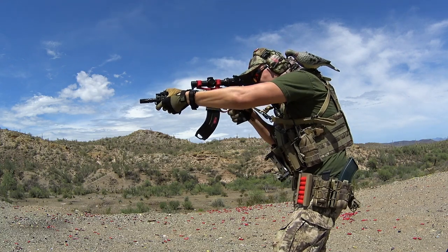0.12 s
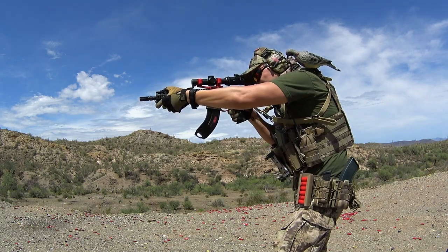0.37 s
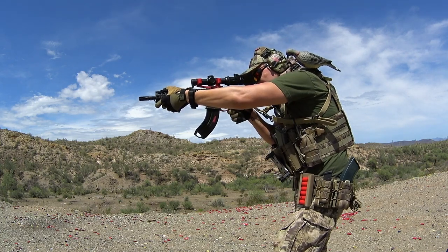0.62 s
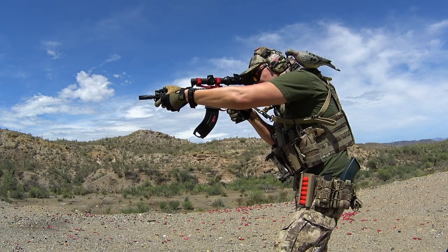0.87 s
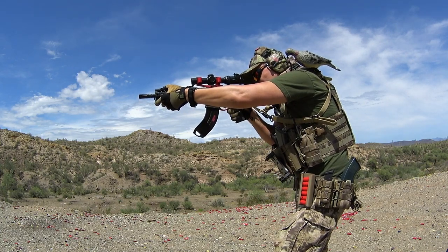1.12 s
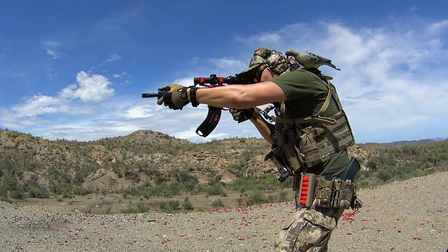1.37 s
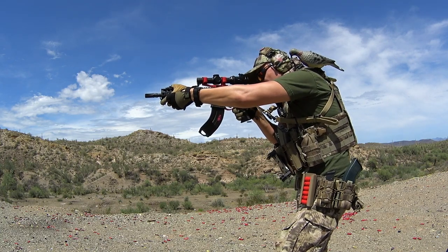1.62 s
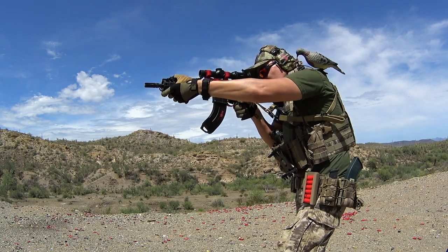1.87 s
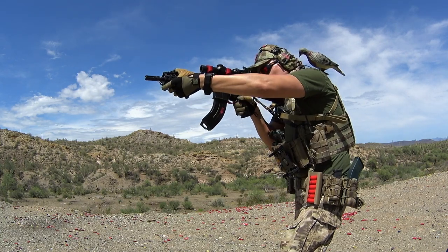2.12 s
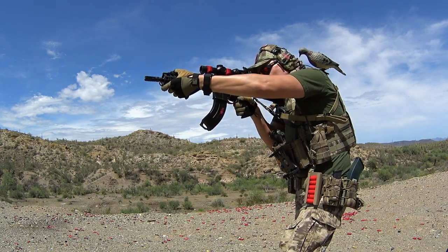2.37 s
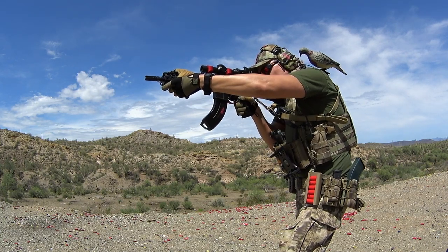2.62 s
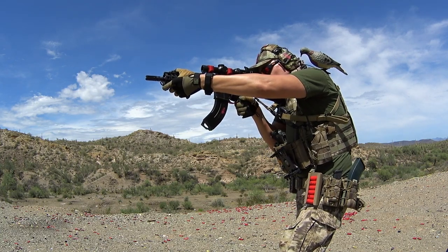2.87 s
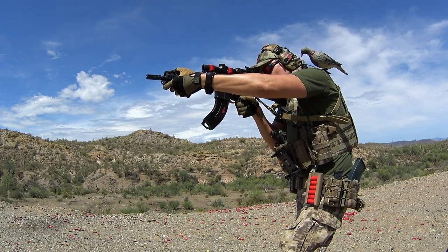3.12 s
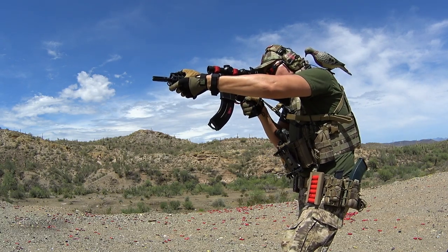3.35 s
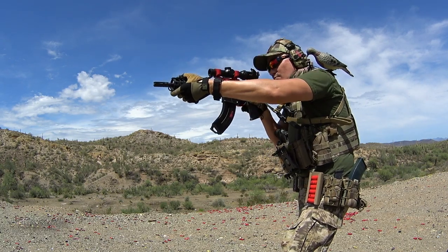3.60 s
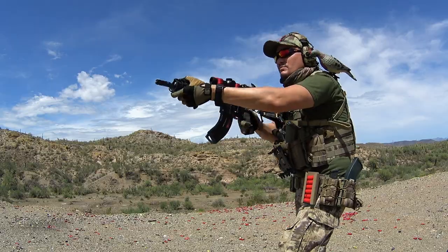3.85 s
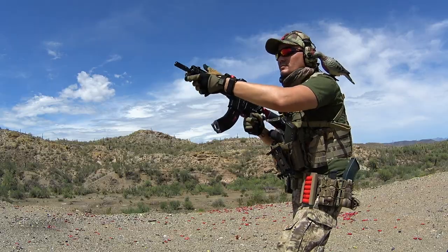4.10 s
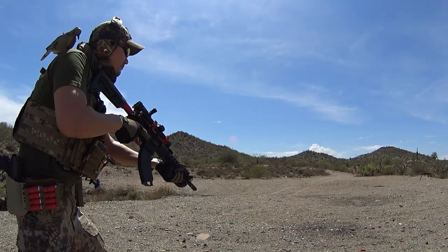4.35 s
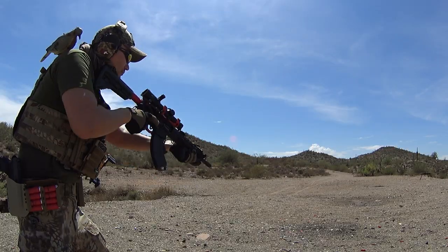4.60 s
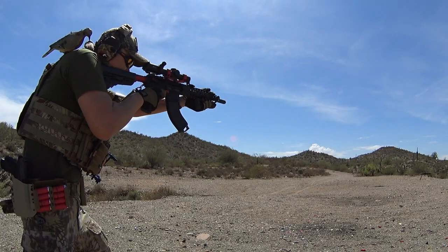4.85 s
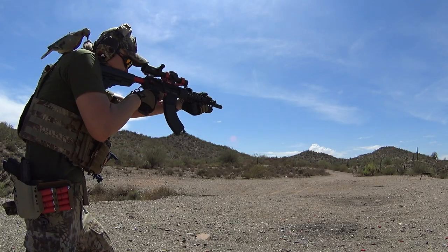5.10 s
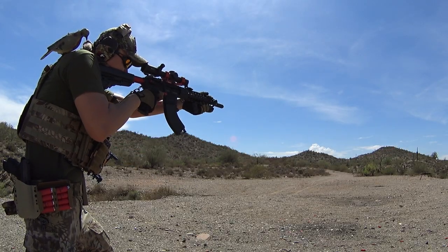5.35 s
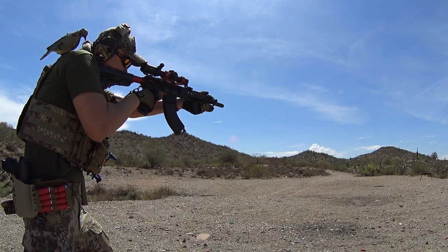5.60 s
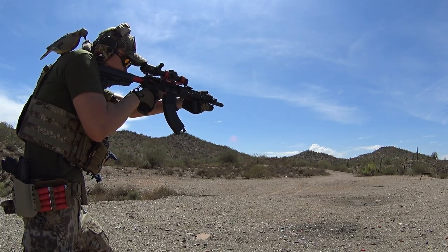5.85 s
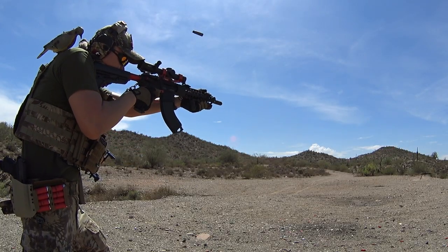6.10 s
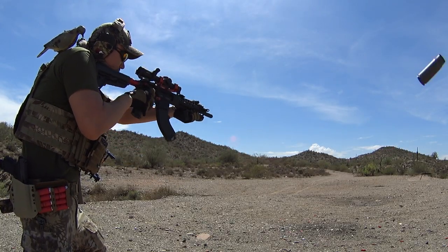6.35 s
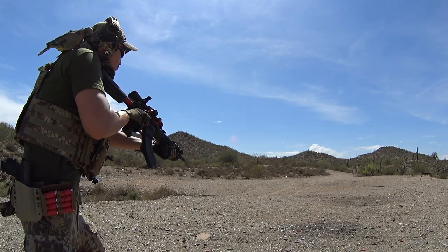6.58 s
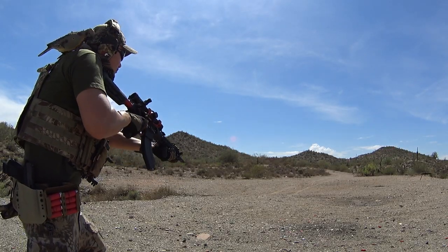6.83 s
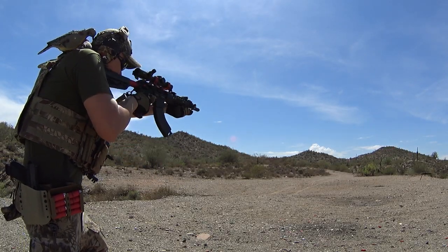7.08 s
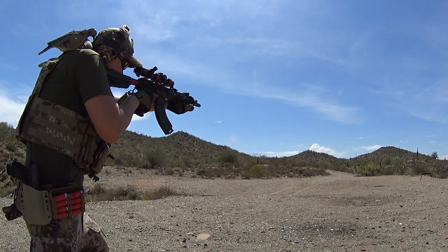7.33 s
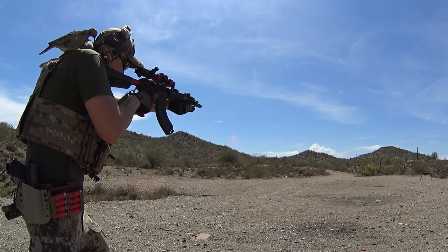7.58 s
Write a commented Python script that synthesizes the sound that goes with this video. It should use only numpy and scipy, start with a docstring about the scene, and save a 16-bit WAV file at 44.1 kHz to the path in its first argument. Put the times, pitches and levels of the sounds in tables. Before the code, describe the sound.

Outdoors on open stony ground, a few steps from the shooter, wind bumps the microphone softly. A rifle cracks, its bolt clacks, steel rings and a spent case tinkles; a second shot follows nearly two seconds later with a richer metallic ring. Gear clicks, then the place cuts abruptly, echoes stop, cloth rustles faintly, and a third shot rings and rolls away from the hills.

```python
"""Open stony ground: three rifle shots, heard from a few steps away, in two scenes joined by an abrupt cut.
Each shot is bursts of coloured noise: hammer tick, muzzle blast, bolt slamming home. Fading sine tones make the
struck steel ring. Long noise, shaped in level, makes the echoes that roll back from the hills.
Gear clicks and cloth rustles as noise; spent cases tinkle as pairs of high tones on gravel.
Wind rumbles on the microphone as low noise, with short low thumps, above a faint hiss."""
import sys
import numpy as np
from scipy import signal
from scipy.fft import rfft, irfft
from scipy.io import wavfile

SR = 44100
rng = np.random.default_rng(int(sys.argv[2]) if len(sys.argv) > 2 else 0)


def decibels_to_gain(level_db):
    """Convert a level in decibels to a linear amplitude gain (20 dB per decade)."""
    exponent = np.asarray(level_db, float) / 20
    return 10 ** exponent


def wav_record(signal):
    """Record a signal, one row per channel, as 16-bit PCM in the file named by sys.argv[1]."""
    frames = np.transpose(np.atleast_2d(signal))
    bounded = np.clip(frames, -1, 1)
    # unit amplitude maps onto the largest positive 16-bit level
    quanta = np.round(bounded * 32767).astype(np.int16)
    wavfile.write(sys.argv[1], SR, quanta)


N = 340011


def rms_one(x):
    """Scales to rms 1."""
    return x / np.sqrt(np.mean(x ** 2) + 1e-20)


def in_time(rows):
    """Columns of a table, joined by straight lines in time."""
    s, *columns = np.transpose(rows)
    return [np.interp(np.arange(N) / SR, s, column) for column in columns]


def at_hz(points, hz):
    """Reads a spectrum on a log frequency axis."""
    point_hz, db = np.transpose(points)
    return np.interp(np.log(hz), np.log(point_hz), db)


def drift(rate):
    """Slow random wandering of spread 1; a higher rate wanders faster."""
    r = np.exp(-80 * np.pi * rate / SR)   # computed at every 40th sample only
    draws = rng.standard_normal(N // 40 + 2002)
    slow = signal.lfilter([1], [1, -2 * r, r * r], draws)[2000:]
    return np.interp(np.arange(N) / 40, np.arange(len(slow)), rms_one(slow))


# tilt of all noise to the left or right: (frequency [Hz], left over right [dB])
BALANCE = [(60, -0.5), (180, 0.5), (550, 0.0), (1650, 1.0), (4970, 1), (15000, 1.5)]


def noise(spectrum, width, low_hz=0, high_hz=SR):
    """Stereo noise of a given mid colour, width and balance, within two edges; the mid has rms 1."""
    hz = np.arange(N // 2 + 1) * SR / N + 1e-3
    mid, side = rfft(rng.standard_normal((2, N)))
    pair = mid + decibels_to_gain(at_hz(width, hz)) * side * [[1], [-1]]
    colour_db = at_hz(spectrum, hz) + at_hz(BALANCE, hz) * [[.5], [-.5]]
    colour = decibels_to_gain(colour_db) * (hz >= low_hz) * (hz < high_hz)
    out = irfft(pair * colour, N)
    return out / np.std(out.mean(axis=0))


def dying(s, t60, rise_s):
    """First sample and an envelope that swells, then falls 60 dB in t60."""
    start = round(s * SR)
    t = np.arange(min(round(1.3 * SR * t60), N - start)) / SR
    return start, (1 - np.exp(-t / rise_s)) * decibels_to_gain(-60 * t / t60)


def panned(db):
    """Gains of the two channels, db apart."""
    return decibels_to_gain(np.array([[db / 2], [-db / 2]]))


def tone(hz, shape, phase=0):
    """A sine under an envelope."""
    return shape * np.sin(2 * np.pi * hz * np.arange(len(shape)) / SR + phase)


# the shots: (time [s], blast level [dB], bark level [dB], left over right [dB])
SHOTS = [(1.3797, -8.5, -16, 1.5), (3.2049, -7.5, -15, 1), (5.9778, -7, -23, -2)]
# colour of the crack: (frequency [Hz], relative level [dB])
CRACK_COLOUR = [(180, -46.5), (300, -19.5), (629, -15), (1410, -3.5), (2150, -10), (3820, -7.5),
                (4150, -9.5), (5810, -7), (7610, -19), (10100, -24.5), (14900, -10.5), (16000, -27.5),
                (16800, -52)]
# colour of clicks, bolt and snap: (frequency [Hz], relative level [dB])
CLICK_COLOUR = [(410, -50.5), (700, -16.5), (2350, -18.5), (3020, -2.5), (3550, -9), (5010, 0.5),
                (6450, -3.5), (7370, -20), (8640, -14), (10100, -17), (14700, 2), (15500, -8),
                (16800, -37.5)]
# stereo width of rifle and gear: (frequency [Hz], side over mid [dB])
NEAR_SIDE = [(60, -8.5), (150, -16), (380, 4), (950, -10.5), (2380, -1.5), (5980, -13.5), (15000, -14.5)]
BARK_HZ, BARK_WIDTH_HZ = 1380, 440


def blasts():
    """A bright snap and a longer crack over a barking resonance of the muzzle device; the barrel rings on."""
    crack = noise(CRACK_COLOUR, NEAR_SIDE)
    snap = noise(CLICK_COLOUR, NEAR_SIDE, 2500)
    bark = noise([(20, -60), (BARK_HZ - BARK_WIDTH_HZ, -12), (BARK_HZ, 0),
                  (BARK_HZ + BARK_WIDTH_HZ, -12), (8000, -50)], NEAR_SIDE)
    out = np.zeros((2, N))
    for s, db, bark_db, pan_db in SHOTS:
        # each layer: (noise, level [dB], time to fall 60 dB [s], rise [s])
        layers = [(snap, db - 5, .025, .0006), (crack, db - 11, .16, .001), (bark, bark_db, .15, .003)]
        for layer, level_db, t60, rise_s in layers:
            i, shape = dying(s, t60, rise_s)
            burst = layer[:, i:i + len(shape)] * shape
            out[:, i:i + len(shape)] += burst * decibels_to_gain(level_db) * panned(pan_db)
        i, shape = dying(s, .8, .02)
        out[:, i:i + len(shape)] += decibels_to_gain(-32) * tone(1938, shape)   # steel of the rifle
    return out


# hard slaps of the blast off near banks and the plate:
# (time [s], slap level [dB], thump level [dB], left over right [dB])
SLAPS = [(1.495, -4.5, -20, 8), (1.51, -11, -18, -5), (1.53, -15, -27.5, 11.5), (1.574, -17, -33.5, -18),
         (2.057, -30.5, -24, 12), (2.515, -23, -30, 4.5), (3.356, -14.5, -14, -2),
         (3.395, -16.5, -33.5, 3.5), (3.406, -10, -31.5, -8.5), (6.096, -2, -26, -3.5),
         (6.131, -13, -27, -2), (6.174, -10, -24, 9)]
SLAP_HZ, SLAP_T60_S = 1440, .0056


def slaps():
    """A cycle or two of pressure with a sharp edge, with a low thump that reaches both ports alike."""
    out = np.zeros((2, N))
    for s, db, thump_db, pan_db in SLAPS:
        # each part: (pitch [Hz], level [dB], time to fall 60 dB [s], rise [s], left over right [dB])
        parts = [(SLAP_HZ, db, SLAP_T60_S, .0002, pan_db),
                 (3.6 * SLAP_HZ, db - 11, SLAP_T60_S / 2, .0001, pan_db),
                 (246.6, thump_db, .069, .002, 0)]
        for hz, level_db, t60, rise_s, side_db in parts:
            i, shape = dying(s, t60, rise_s)
            out[:, i:i + len(shape)] -= decibels_to_gain(level_db) * tone(hz, shape) * panned(side_db)
    return out


# modes of three pieces of steel: (frequency [Hz], level [dB], unstretched time to fall 60 dB [s],
# swell [s], left over right [dB], phase by which the left leads [rad])
STAND = [(991, -33, 1.5, .06, 0, .2), (1425, -33, 1.8, .05, 3, .4), (1937, -22, 1.1, .1, 0, .3)]
NEAR_PLATE = [(4684, -31, .9, .03, 4, -2.0), (4693, -33, .7, .03, 4, -2.0), (4702, -50, 3.4, .02, 4, -2.0)]
FAR_PLATE = [(2796, -31, .35, .005, 7, 1.3), (3877, -30, .9, .1, 0, 0), (4560, -34, .4, .005, 7, 2.9),
             (5070, -31, .45, .01, 4, 2.9), (5082, -33, .45, .01, 4, 2.9), (5809, -34, .7, .08, 4, -1.0),
             (5956, -30, .2, .005, 8, -1.1), (6087, -27, .22, .005, 8, -1.0), (6850, -50, .5, .01, 4, -2.2),
             (7404, -42, .4, .03, 4, .2), (10127, -49, .4, .04, -7, -1.2), (11620, -51, .4, .03, -7, 0),
             (15170, -39, .25, .01, 0, 0)]
# bullet strikes: (what rings, time [s], added level [dB], stretch of the ring [factor])
STRIKES = [(STAND, 1.511, -5, 1.0), (NEAR_PLATE, 1.505, 4, 1.0), (STAND, 3.396, 0, 1.0),
           (FAR_PLATE, 3.396, 0, 1.0), (STAND, 6.098, -8, 1.3), (NEAR_PLATE, 6.098, -1, 1.4)]


def plate():
    """A strike sets every mode of its steel ringing; close modes beat, each mode's level wavers slightly."""
    out = np.zeros((2, N))
    for modes, s, strike_db, stretch in STRIKES:
        for hz, db, t60, swell_s, pan_db, lead in modes:
            total = abs(decibels_to_gain(pan_db / 2) * np.exp(1j * lead) + decibels_to_gain(-pan_db / 2))
            ports = panned(pan_db) / total * 2   # the mean of both channels has gain 1
            i, shape = dying(s, t60 * stretch, swell_s)
            shape = shape * decibels_to_gain(2 * drift(14))[i:i + len(shape)]
            pair = [tone(hz, shape, lead), tone(hz, shape)]
            out[:, i:i + len(shape)] += decibels_to_gain(db + strike_db) * ports * pair
    return out


def bursts(rows, t60s, swell_s, edge_db):
    """Short bursts, each with its own weight of thud, snap and sizzle; edge_db sets the hard first contact."""
    edges_hz = [(600, 2500), (2500, 8500), (8500, 17500)]
    bands = [noise(CLICK_COLOUR, NEAR_SIDE, *edges) for edges in edges_hz]
    out = np.zeros((2, N))
    for s, snap_db, thud_db, sizzle_db, pan_db in rows:
        for band, level_db, t60 in zip(bands, [thud_db, snap_db, sizzle_db], t60s):
            i, shape = dying(s, t60, swell_s)
            t = np.arange(len(shape)) / SR
            shape = shape * (1 + decibels_to_gain(edge_db - 60 * t / .007))
            burst = band[:, i:i + len(shape)] * shape
            # evens out the chance in the energy of so short a noise
            even = np.sqrt(np.sum(shape ** 2) / np.sum(burst.mean(axis=0) ** 2))
            out[:, i:i + len(shape)] += decibels_to_gain(level_db) * even * burst * panned(pan_db)
    return out


# the bolt slams home, several parts at once:
# (time [s], snap level [dB], thud level [dB], sizzle level [dB], left over right [dB])
BOLT = [(1.4542, -21, -26.5, -19.5, 1.5), (3.274, -16, -29.5, -21, 1.5), (6.0572, -14.5, -27, -17.5, -5.5)]


def bolt():
    """Heavy parts meeting: a blunt clack with a slower start and little edge."""
    return bursts(BOLT, [.03, .024, .02], .0008, -19)   # fall of thud, snap, sizzle [s]; swell [s]; edge [dB]


# ticks of hammer and gear, bullet splashes on the plate, gravel:
# (time [s], snap level [dB], thud level [dB], sizzle level [dB], left over right [dB])
CLICKS = [(.207, -53.5, -59, -56, -1), (0.482, -66, -55, -75, 2), (1.3727, -17.5, -35, -19.5, 1),
          (1.509, -29.5, -25, -38, 4), (1.5945, -46, -25.5, -40, -1), (1.88, -35, -42, -55, -1),
          (2.099, -37, -54, -39, -1), (2.831, -50, -55, -57, 0), (3.1982, -19, -28.5, -18.5, -1),
          (3.3956, -25.5, -18, -40, 5), (3.6587, -18, -44, -20.5, -1), (3.846, -37, -46, -45, -1),
          (3.8944, -26, -30.5, -34, -2), (3.942, -35, -53, -33, -2), (3.967, -34, -42, -49, 0),
          (4.102, -21.5, -30.5, -33, -1), (4.1619, -43, -55, -48, 0), (4.6194, -52, -56, -58, 1),
          (4.6474, -28, -42.5, -30.5, 1), (4.709, -67, -53, -73, 3), (5.6126, -68, -53.5, -78, -6),
          (5.9706, -18.5, -33, -18, 0), (6.1753, -26, -29, -35, -1), (6.5033, -20.5, -31, -26, 2),
          (6.549, -31.5, -42, -30, 3), (6.6928, -38, -49, -39.5, -10), (6.919, -59, -40, -58, -7),
          (7.0087, -52, -39, -50, -3), (7.0339, -31.5, -46, -41, -3)]


def clicks():
    """Short hard contacts: ticks of hammer and gear, bullet splashes on the plate, gravel."""
    return bursts(CLICKS, [.024, .02, .018], .0002, 3)   # fall of thud, snap, sizzle [s]; swell [s]; edge [dB]


# how strongly ground and hills return any shot: (time after the shot [s], level [dB])
TERRAIN = [(0, -26.5), (.04, -29), (.09, -34.5), (.12, -32), (.15, -35), (.19, -30), (.23, -31.5),
           (.27, -29.5), (.32, -32.5), (.4, -35.5), (.5, -38), (.6, -40), (.7, -40), (.76, -43), (.8, -38),
           (.89, -35.5), (.96, -39.5), (1.05, -37), (1.15, -41), (1.25, -46), (1.5, -43), (1.8, -47),
           (2.9, -68)]
# how loud, bright and boomy each shot's echo is, and how fast its treble fades:
# (level [dB], brightness [dB per band going up], boom [dB], share of the treble loss [factor])
ECHO_TRAITS = [(0.5, -1.5, 0.5, 0.53), (0.5, -1.5, -1, 0.3), (1, 3.5, 0.5, 1.54)]
SECOND_SCENE_S = 4.229


def returns(level_db):
    """Adds up the power that the hills return of every shot, each within its own scene.
    level_db(terrain dB, delay s, traits) gives one shot's level."""
    t, power = np.arange(N) / SR, 0
    for (s, *_), traits in zip(SHOTS, ECHO_TRAITS):
        delay = np.maximum(t - s, 0)
        heard = (t > s) & ((t < SECOND_SCENE_S) | (s > SECOND_SCENE_S))
        hills_db = np.interp(delay, *np.transpose(TERRAIN))
        power = power + heard * decibels_to_gain(2 * level_db(hills_db, delay, traits))
    return np.sqrt(power)


# colour of the echoes: (frequency [Hz], relative level [dB])
ECHO_COLOUR = [(210, -30), (350, -8.5), (468, -16), (658, -9), (971, -11.5), (1460, -8.5), (1830, -10),
               (1920, -10), (2410, -14), (4380, -11.5), (4830, -12.5), (10000, -30), (15000, -22),
               (16000, -29.5), (16800, -80)]
# stereo width of echoes and low end: (frequency [Hz], side over mid [dB])
FAR_SIDE = [(60, -31.5), (120, -18.5), (240, -28.5), (480, -9.5), (950, -11.5), (1890, -7), (3770, -3),
            (7520, -6), (15000, -18.5)]
# where the bands cross over: end of middle alone, start and end of treble alone, start of top alone [Hz]
ECHO_EDGES = [1600, 3500, 5800, 7300]
# middle, treble and top of the echoes:
# (level at the shot [dB], air loss before the shot's share [dB/s], own flicker [dB])
AIR = [(0.7, 0.7, 1.5), (-0.5, 8, 0.87), (-5, 24.5, 3)]


def echoes():
    """Countless returns from rocks and slopes as noise; air takes the treble first; the level flickers."""
    whole = rfft(noise(ECHO_COLOUR, FAR_SIDE))
    together_db = 1.3 * drift(19.3) + 1.046 * drift(90.0)
    log_hz = np.log(np.arange(N // 2 + 1) * SR / N + 1e-3)
    shares = [[1, 0, 0, 0], [0, 1, 1, 0], [0, 0, 0, 1]]   # each band at the four edges; they add up flat
    out = 0
    for k, (share, (db, loss_db, flicker_db)) in enumerate(zip(shares, AIR)):
        band = irfft(whole * np.interp(log_hz, np.log(ECHO_EDGES), share), N)
        level = returns(lambda hills_db, delay, traits:
                        hills_db + traits[0] + db + k * traits[1] - loss_db * traits[3] * delay)
        out = out + band * level * decibels_to_gain(together_db + flicker_db * drift(33.0))
    return out


# colour of the boom: (frequency [Hz], relative level [dB])
BOOM_COLOUR = [(76, -47.5), (130, -24.5), (145, -19), (230, 2.5), (248, 2.5), (287, -2), (426, -27),
               (480, -27), (620, -42), (1060, -120)]


def boom():
    """The low end of the shots swells and rolls back from the hills, evener than the rest."""
    # it takes 0.61 of the hills' swing in dB and swells over 0.012 s
    level = returns(lambda hills_db, delay, traits: -11 + traits[2] + 0.61 * hills_db
                    + 20 * np.log10(1.001 - np.exp(-delay / 0.012)))
    return noise(BOOM_COLOUR, FAR_SIDE) * level * decibels_to_gain(2 * drift(21.0))


# a spent case ringing in flight: (frequency [Hz], level [dB], time to fall 60 dB [s], left over right [dB])
FLYING_CASE = [(7117, -50, .2, 2), (7648, -44, .38, 6), (8406, -53, .22, -10), (11550, -42, .26, -9),
               (12840, -48, .3, -3), (15205, -38, .24, 0), (15395, -24, .25, 0)]
KNOCK_S, PULSES_PER_S = 1.509, 32


def flying_case():
    """A knocked case rings in pulsing tones, each in its own phase, then fades fast as it drops away."""
    t, i, out = np.arange(SR // 2) / SR, round(KNOCK_S * SR), np.zeros((2, N))
    for hz, db, fade_s, pan_db in FLYING_CASE:
        pulsing = 1 + .6 * np.cos(2 * np.pi * PULSES_PER_S * t + rng.uniform(0, 2 * np.pi))
        fade = decibels_to_gain(db - 60 * (t / fade_s) ** 1.7)   # slow at first, then ever faster
        shape = (1 - np.exp(-t / .022)) * fade * pulsing
        out[:, i:i + len(t)] += panned(pan_db) * tone(hz, shape)
    return out


# spent cases landing: (time [s], level [dB], frequency [Hz], time to fall 60 dB [s])
CASES = [(2.098, -32, 12200, 0.11), (2.46, -65, 12600, 0.11), (2.8315, -40.5, 12700, 0.082),
         (3.9435, -33, 11720, 0.028), (4.102, -47, 13900, 0.045), (6.70, -56, 12600, 0.069)]


def cases():
    """A thin tube rings briefly on two close pitches."""
    out = np.zeros(N)
    for s, db, hz, t60 in CASES:
        i, shape = dying(s, t60, 0.00025)
        out[i:i + len(shape)] += decibels_to_gain(db) * (tone(hz, shape) + .4 * tone(hz * 1.012, shape))
    return out


def rustle():
    """Soft uneven friction of cloth and straps as the rifle comes up."""
    i, shape = dying(4.55, 2.0, .12)
    level = np.pad(shape, (i, N))[:N] * decibels_to_gain(-62 + 4.6 * drift(24.7))
    return level * noise([(600, -28), (1200, 1), (4500, -3.5), (6500, -5), (9000, -31)], NEAR_SIDE)


# colour of the wind's rumble: (frequency [Hz], relative level [dB])
RUMBLE_COLOUR = [(12, -35.5), (20, -12), (103, -3.5), (140, -8), (160, -6), (210, -8.5), (350, -120)]
# wind on the ports, in three stretches: (time [s], rumble level [dB], boomy part over the rumble [dB])
WIND = [
    [(0.0, -51, -0.5), (0.258, -53.5, -3.5), (0.328, -64, -8), (0.618, -62.5, -1), (0.992, -58, -10.5),
     (1.178, -61, -15), (1.37, -63, -6)],
    [(1.38, -50, 2), (1.55, -65, -1), (1.74, -54.5, 8), (1.98, -44, -2.5), (2.55, -53, -9),
     (2.69, -57.5, -4), (2.93, -55.5, 13), (3.11, -50.5, -12), (3.5, -55, -1.5), (3.74, -45, -10),
     (3.98, -53, -8), (4.06, -45, -7), (4.23, -53, -15)],
    [(4.23, -63.5, -2), (4.34, -65.5, -5), (4.67, -68.5, -3), (5.11, -49, -9), (5.41, -47.5, -2),
     (5.53, -42.5, -3), (5.82, -40, 1.5), (5.98, -46, 0.5), (6.24, -52, -6), (6.53, -46.5, 2),
     (6.97, -46.5, -4), (7.28, -43, -9), (7.55, -53.5, -5), (7.71, -43, -2)],
]
# low thumps: wind buffets, and after shots lumps of the rolling boom:
# (time [s], level [dB], frequency [Hz])
LOW_THUMPS = [(0.018, -30.5, 186), (0.124, -49, 212), (0.197, -46, 91), (0.289, -46, 53.8),
              (0.328, -33, 192), (0.4, -49, 75.4), (0.557, -36.5, 98), (0.589, -35, 224),
              (0.766, -34.5, 120), (0.899, -47, 78.1), (0.978, -57, 80.7), (1.068, -46, 118),
              (1.127, -31.5, 217), (1.947, -26, 121), (2.059, -17.5, 248), (2.248, -30, 286),
              (2.749, -29, 280), (3.708, -24.5, 209), (3.793, -22.5, 246), (3.901, -23.5, 267),
              (4.889, -40, 72), (5.021, -42.5, 64.6), (5.36, -33, 235), (5.4, -29, 191), (5.489, -44, 159),
              (5.641, -29, 99), (5.713, -23, 225), (5.789, -45.5, 222), (5.85, -37, 196), (5.9, -26, 246),
              (6.358, -16.5, 208), (6.669, -18, 260), (6.707, -40, 268), (6.769, -32, 265),
              (7.223, -29, 205), (7.339, -33, 226), (7.465, -32, 248), (7.551, -28, 203)]


def wind_and_thumps():
    """Lumpy wind pressure on the microphone ports; low thumps ring a few cycles, with a rough edge."""
    rumble_db, boomy_db = in_time(np.vstack(WIND))
    rumble, boomy = noise(RUMBLE_COLOUR, FAR_SIDE), noise(BOOM_COLOUR, FAR_SIDE)
    out = rumble + boomy * decibels_to_gain(boomy_db + 2.0 * drift(16.0))
    out = out * decibels_to_gain(rumble_db + 6 * drift(6.4))
    for s, db, hz in LOW_THUMPS:
        i, shape = dying(s, 10.3 / hz, .002)   # falls 60 dB in 10.3 cycles
        shape = shape / shape.max()
        rough = decibels_to_gain(-13) * shape * (rumble + boomy)[:, i:i + len(shape)]
        out[:, i:i + len(shape)] += decibels_to_gain(db) * (tone(hz, shape) + rough)
    return signal.sosfilt(signal.butter(6, 313, fs=SR, output="sos"), out)   # keeps only the lows


# colour of the hiss: (frequency [Hz], relative level [dB])
HISS_COLOUR = [(180, -26), (300, -16), (361, -15.5), (393, -17), (550, -16.5), (651, -18), (867, -19),
               (927, -19.5), (2380, -24.5), (2820, -26), (3010, -25.5), (4440, -26.5), (9640, -46),
               (14700, -30), (16800, -49.5)]
# stereo width of the hiss: (frequency [Hz], side over mid [dB])
HISS_SIDE = [(60, -19), (130, -11), (290, 4), (640, 8), (1410, 7), (3100, 2.5), (6820, -2), (15000, -12)]
# faint high tones: (frequency [Hz], relative level [dB])
WHINE = [(13308, -90), (14266, -90.5)]


def hiss():
    """Smooth noise floor with faint wavering tones."""
    t = np.arange(N) / SR
    tones = 0
    for hz, db in WHINE:
        tones = tones + decibels_to_gain(db + 7 + 2.0 * drift(10.0)) * np.sin(2 * np.pi * hz * t)
    return decibels_to_gain(-63.5) * noise(HISS_COLOUR, HISS_SIDE) + tones


def scene():
    """All sources; the ring of steel and barrel stops at the cut and stays silent until the third shot."""
    ring = plate() + blasts()
    ring[:, round(SECOND_SCENE_S * SR):round(SHOTS[2][0] * SR)] = 0
    shots = ring + slaps() + bolt() + echoes() + boom()
    details = clicks() + flying_case() + cases() + rustle()
    return shots + details + wind_and_thumps() + hiss()


def top_cut(x):
    """Nothing passes above the cut-off."""
    return signal.sosfilt(signal.butter(12, 17000, fs=SR, output="sos"), x)


def record(dry):
    """Loud peaks are rounded off."""
    mix = 0.77 * np.tanh(dry / 0.66)
    return top_cut(mix)


dry = scene()
out = record(dry)
wav_record(out)
```